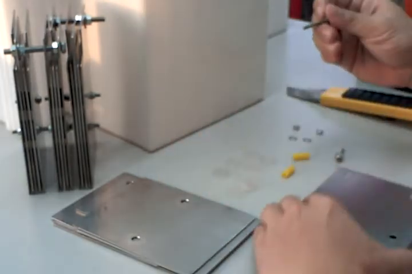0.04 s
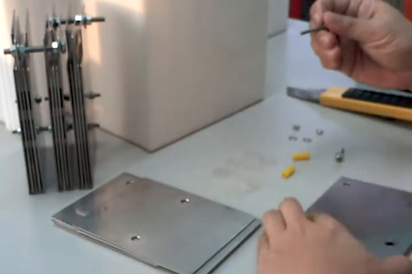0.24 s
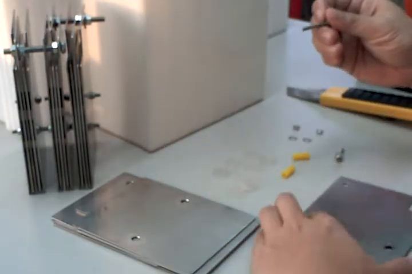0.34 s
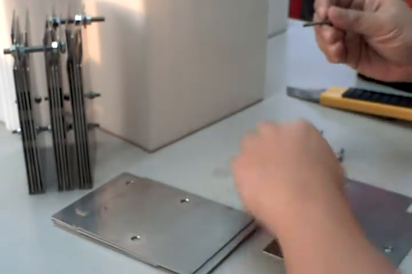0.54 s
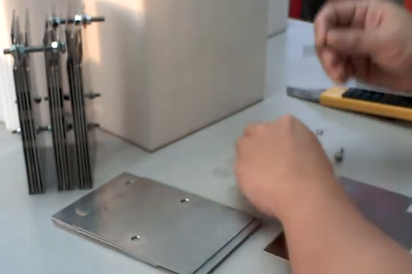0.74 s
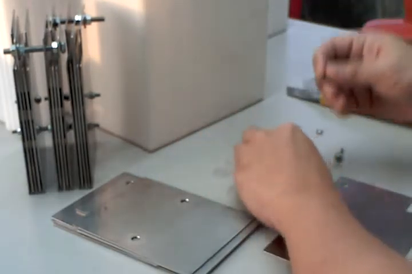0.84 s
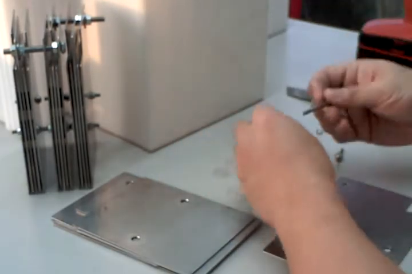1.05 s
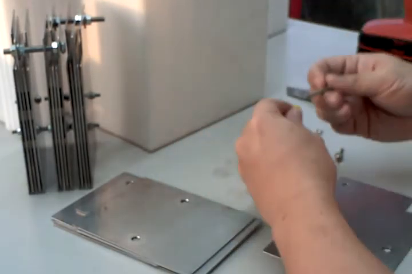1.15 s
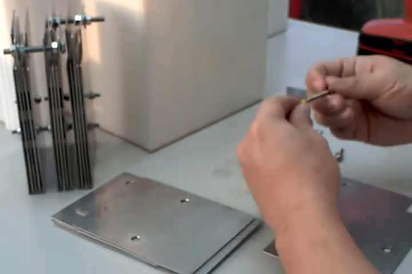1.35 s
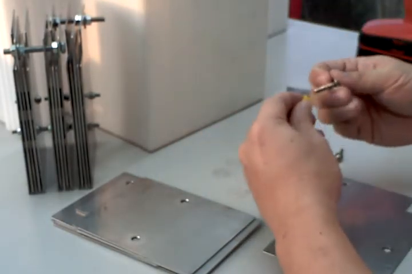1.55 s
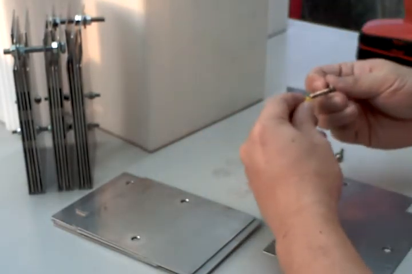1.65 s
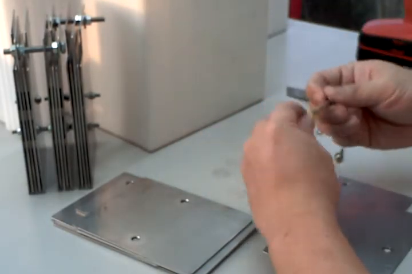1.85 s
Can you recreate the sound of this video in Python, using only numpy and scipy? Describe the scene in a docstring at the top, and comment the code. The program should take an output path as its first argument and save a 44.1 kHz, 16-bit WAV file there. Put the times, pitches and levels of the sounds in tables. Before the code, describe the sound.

A steel plate clacks down on a table, followed by a light tap.

```python
"""A ringing clack whose noise starts faintly about 3 ms before the full hit: a steel plate is let down
on a work table. The impact excites its bending modes, close enough to the microphone to overload the
recorder. A light, damped tap follows. A small hard room reverberates after both, over a steady rush of air."""
import sys
import numpy as np
from scipy import signal
from scipy.fft import rfft, irfft, next_fast_len
from scipy.io import wavfile

SR = 44100
rng = np.random.default_rng(int(sys.argv[2]) if len(sys.argv) > 2 else 0)


def master(y):
    """Save y as 16-bit WAV."""
    cut = np.clip(np.atleast_2d(y).T, -1, 1)
    pcm = np.round(cut * 32767)  # scale
    wavfile.write(sys.argv[1], SR, pcm.astype(np.int16))


N = 83790

# spectral envelope of the plate's dense modes and contact noise: f/Hz, relative level/dB
PLATE_SPECTRUM = [(60, -19), (250, -25), (400, -24), (480, -2.5), (620, -9.5), (950, -2), (1350, -3.5),
                  (1850, 3), (2200, -10), (2650, -0.5), (3700, -5.5), (4900, -7.5), (6300, -0.5),
                  (7900, -10), (8500, -8), (9500, -11), (13500, -19), (15500, -41)]
TOP_HZ, BACKGROUND_TOP_HZ = 15700, 14050


def plate_clack(onset_s=0.2298):
    """Impact excitation: the plate slaps the table with a noise burst and a thud, and rings freely."""
    # distinct modes of the plate: f/Hz, level/dB, T60/s
    plate_modes = [(1646, 1, 0.3), (1793, -16, 0.36), (2577, -2.5, 0.2), (2700, -6, 0.21),
                   (3020, -21, 0.35), (3510, -19.5, 0.38), (4530, -8, 0.29), (5510, -10, .27),
                   (5953, -7, 0.24), (6334, -11, 0.24), (6653, -2, 0.26), (7524, -1, 0.2),
                   (8370, -2.5, 0.22), (8580, -5, 0.21)]
    # spectrum of the table's thud: f/Hz, relative level/dB
    table_spectrum = [(20, -14), (70, -10), (180, -9), (450, -1), (900, -6.5), (2500, -38)]
    soft_start_lead_s, contact_t60_s = 0.0027, 0.049
    t = since(onset_s)
    soft_start = amp(-18) * decay(since(onset_s - soft_start_lead_s), contact_t60_s)
    slap = amp(-4.5) * decay(t, contact_t60_s)
    contact = noise(PLATE_SPECTRUM) * (soft_start + slap)
    thud = amp(-27) * noise(table_spectrum) * decay(t, t60=0.13)
    steel = amp(-10) * ring(plate_modes, t) + amp(-6.5) * dense_modes(onset_s)
    return steel + contact + thud + amp(1) * reverberation(contact + thud)


def dense_modes(onset_s, count=420):
    """A thin plate has constant modal density: weak bending modes overlap, about evenly spaced."""
    offset, phase = rng.random((2, count))
    hz = (np.arange(count) + offset) * TOP_HZ / count
    gain = amp(along(PLATE_SPECTRUM, hz))
    t60 = 0.3 * np.exp(0.21 * rng.standard_normal(count))  # log-normal about 0.3 s
    t = np.arange(SR // 2) / SR
    modes = np.sin(2 * np.pi * (hz[:, None] * t + phase[:, None])) * decay(t, t60[:, None])
    ringing = gain @ modes / np.sqrt(np.sum(gain ** 2) / 2)
    return np.pad(ringing, (round(onset_s * SR), N))[:N]


def damped_tap():
    """Heavy damping: a light double contact dies at once and leaves mostly reverberation."""
    # the two contacts: t/s, level/dB
    contacts = [(0.4229, -15), (0.4241, -20.5)]
    # damped resonances: f/Hz, level/dB, T60/s
    tap_modes = [(1037, -4.5, 0.014), (1610, 1, 0.013), (2680, -1.5, 0.019), (3580, -7.5, 0.0087),
                 (6120, -2.5, 0.0067)]
    direct = np.zeros(N)
    for onset_s, db in contacts:
        t = since(onset_s)
        ringing = ring(tap_modes, t)
        crack = amp(-6) * rng.standard_normal(N) * decay(t, t60=0.0064)
        direct += amp(db) * (ringing + crack)
    return direct + amp(-2) * reverberation(direct)


def reverberation(x, wall_delay_s=0.006):
    """Diffuse field: convolution with a noise tail in which each frequency decays at its own rate."""
    # reverberation time of the room: f/Hz, T60/s
    room_t60 = [(100, 0.12), (300, 0.46), (900, 0.44), (2000, 0.32), (6000, 0.38), (13000, 0.25)]
    hz, t, bands = signal.stft(rng.standard_normal(SR * 3 // 4), SR, nperseg=256)
    envelope = np.exp(-np.log(1000) * t / along(room_t60, hz)[:, None])
    tail = signal.istft(bands * envelope, SR, nperseg=256)[1]
    impulse_response = np.pad(tail / np.linalg.norm(tail), (int(wall_delay_s * SR), 0))
    return signal.fftconvolve(x, impulse_response)[:N]


def air_rush(level_db=-43, waver_db=0.71):
    """Broadband noise under slight, slow amplitude modulation: a steady rush of air."""
    # spectrum of the air: f/Hz, relative level/dB
    air_spectrum = [(15, -28), (25, -10.5), (91, -3), (122, -7.5), (155, -3), (186, -10.5), (224, -0.5),
                    (249, -8.5), (390, -5.5), (457, -6.5), (775, -2.5), (862, -3.5), (1010, 0.5),
                    (1460, -1.5), (2170, -12), (3880, -20), (13800, -24)]
    waver = noise([(1, 0), (8, 0), (30, -40), (100, -120)])  # mostly below 8 Hz
    return amp(level_db + waver_db * waver) * noise(air_spectrum)


def ring(modes, t):
    """Modal superposition: damped sines, each of random polarity."""
    signs = rng.choice([-1, 1], len(modes))
    return sum(sign * amp(db) * np.sin(2 * np.pi * hz * t) * decay(t, t60)
               for sign, (hz, db, t60) in zip(signs, modes))


def decay(t, t60):
    """Exponential decay from a sudden start, by 60 dB in t60 seconds."""
    return (t > 0) * np.exp(-np.log(1000) * t / t60)


def noise(spectrum):
    """White noise shaped to a spectrum and scaled to rms 1."""
    coloured = filtered(rng.standard_normal(N), lambda hz: amp(along(spectrum, hz)))
    return coloured / np.sqrt(np.mean(coloured ** 2) + 1e-20)


def filtered(x, response):
    """Linear filtering: the spectrum of x times a frequency response."""
    size = next_fast_len(N + SR // 2)
    hz = np.fft.rfftfreq(size, 1 / SR)
    return irfft(rfft(x, size) * response(hz), size)[:N]


def along(points, hz):
    """Interpolation of (f/Hz, value) points on a logarithmic frequency axis."""
    point_hz, values = np.transpose(points)
    return np.interp(np.log(hz + 1), np.log(point_hz + 1), values)


def since(onset_s):
    """Seconds since the onset, zero before it."""
    return np.maximum(np.arange(N) / SR - onset_s, 0)


def amp(db):
    """Amplitude ratio of a level in decibels."""
    return 10 ** (np.asarray(db) / 20)


def scene():
    """Superposition: the clack over the quieter, low-passed tap and air."""
    clack = plate_clack()
    background = filtered(damped_tap() + air_rush(), lambda hz: hz < BACKGROUND_TOP_HZ)
    return (clack + background)[None]


def record(dry):
    """Saturation: the overloaded input rounds off the clack's peaks, then a low-pass limits the band."""
    ceiling, knee_hardness = 0.7, 6.9
    x = dry[0]
    clipped = x / (1 + np.abs(x / ceiling) ** knee_hardness) ** (1 / knee_hardness)
    low_pass = signal.ellip(10, .1, 90, TOP_HZ, fs=SR, output="sos")
    return signal.sosfilt(low_pass, clipped)[None]


dry = scene()
out = record(dry)
master(out)
```